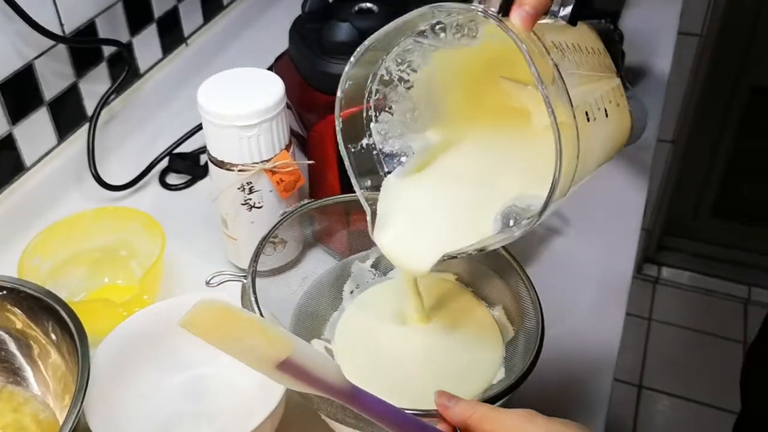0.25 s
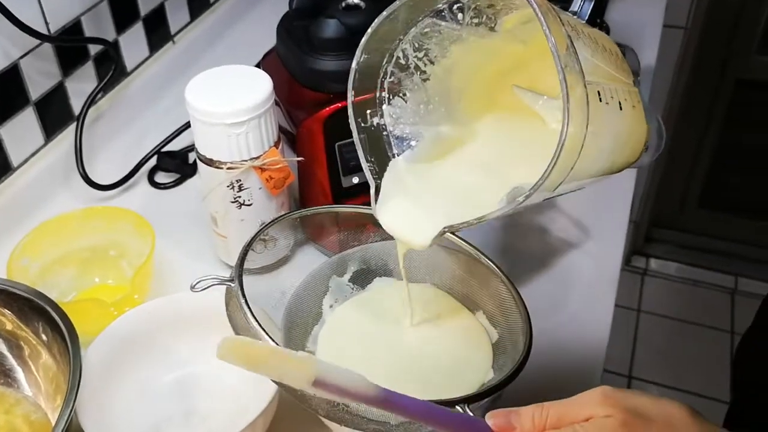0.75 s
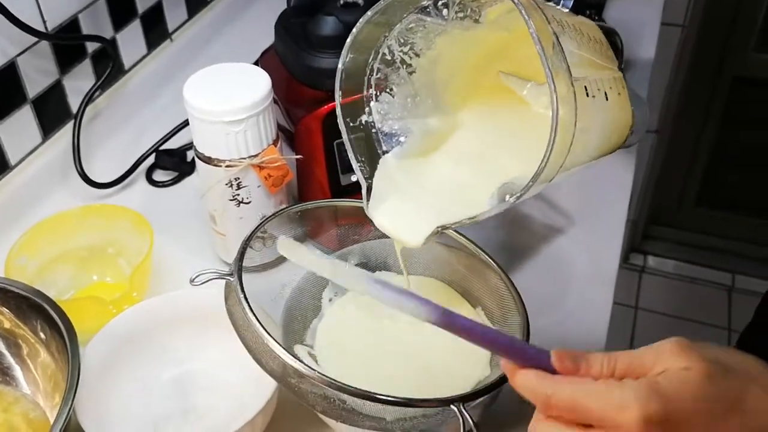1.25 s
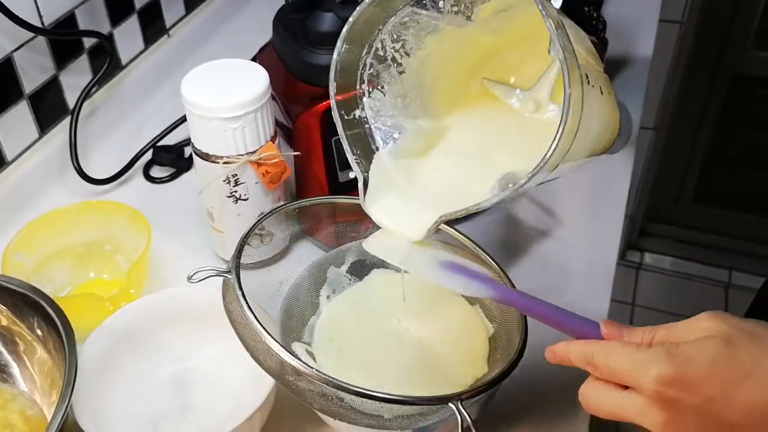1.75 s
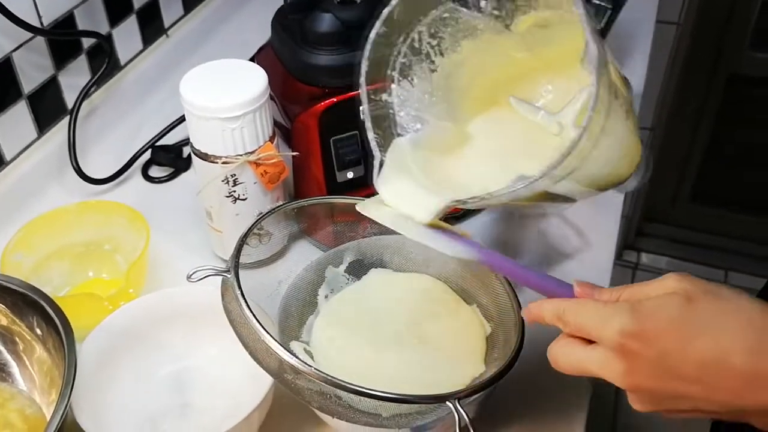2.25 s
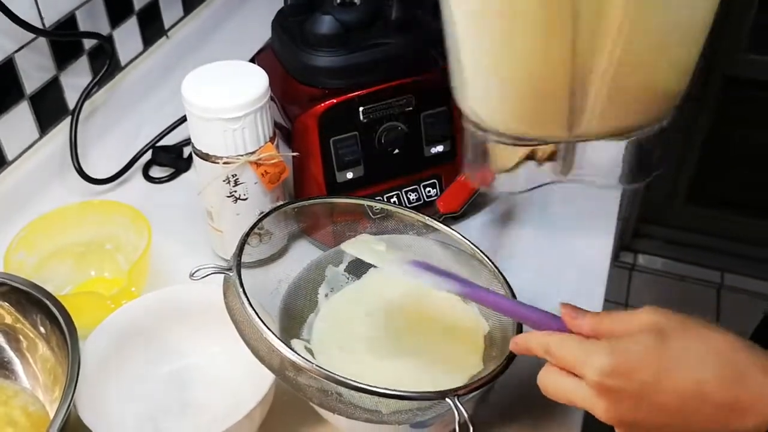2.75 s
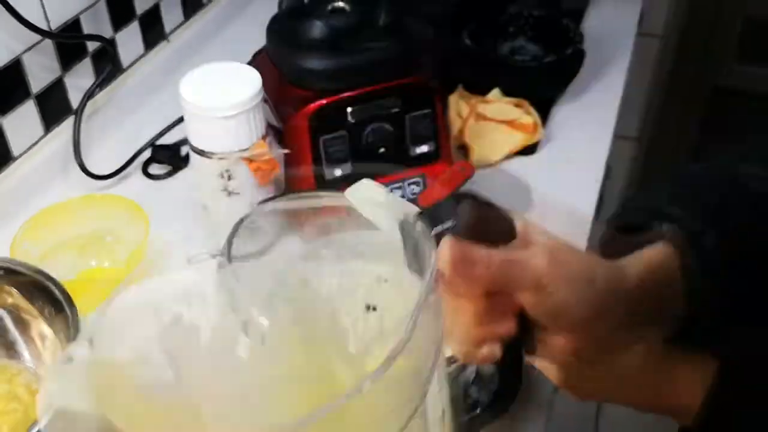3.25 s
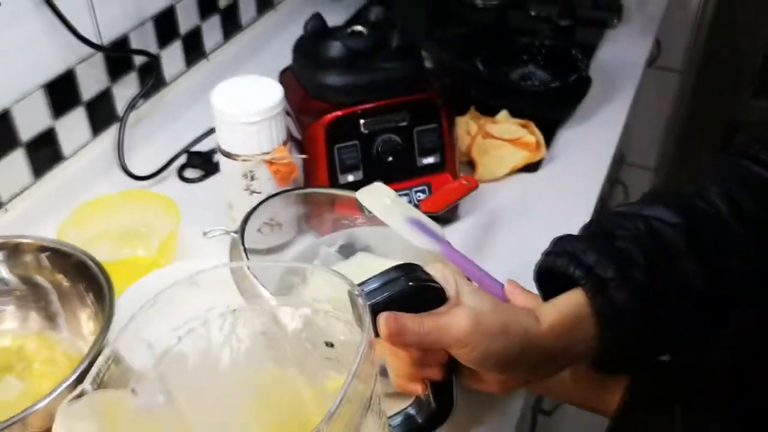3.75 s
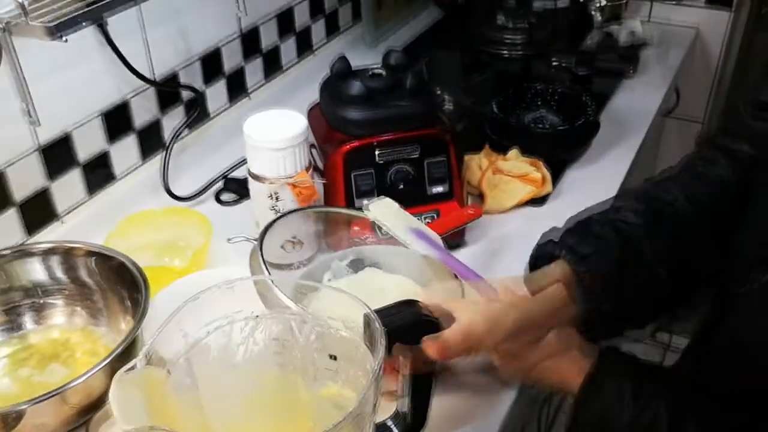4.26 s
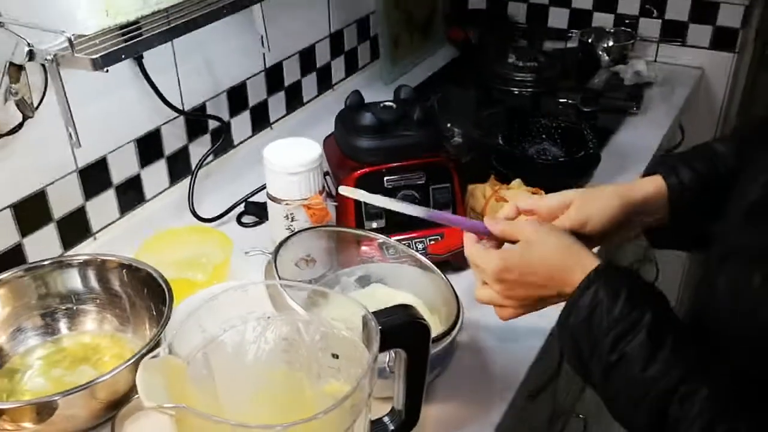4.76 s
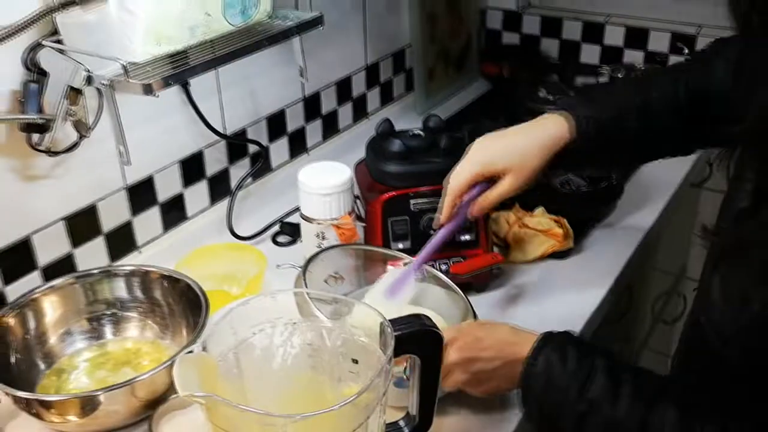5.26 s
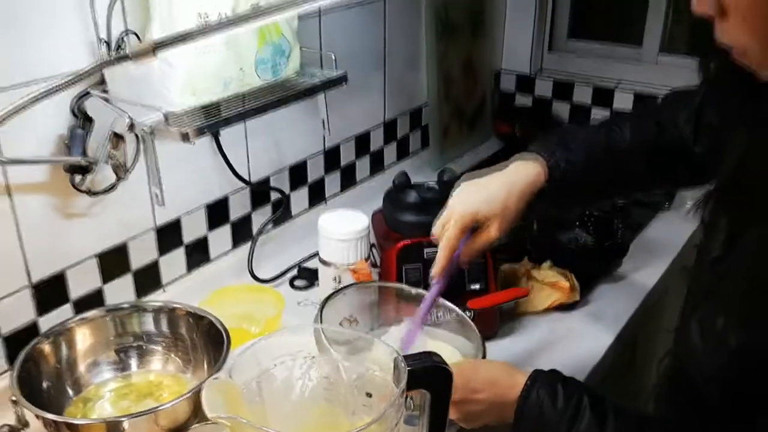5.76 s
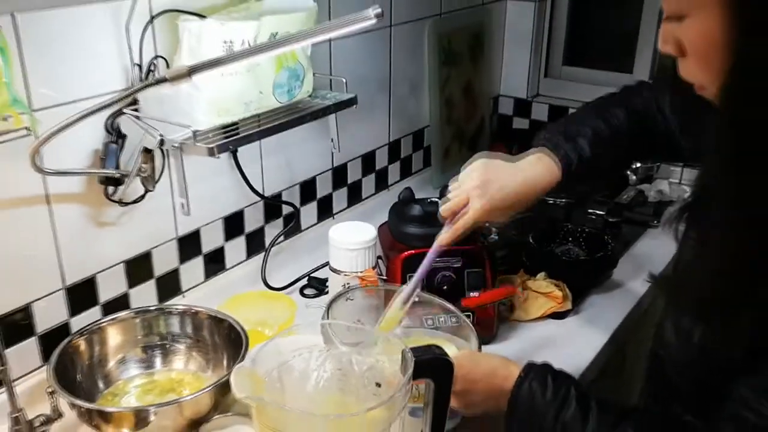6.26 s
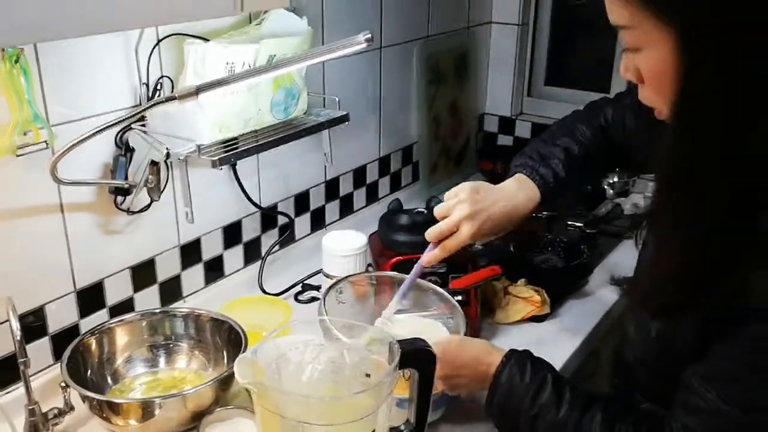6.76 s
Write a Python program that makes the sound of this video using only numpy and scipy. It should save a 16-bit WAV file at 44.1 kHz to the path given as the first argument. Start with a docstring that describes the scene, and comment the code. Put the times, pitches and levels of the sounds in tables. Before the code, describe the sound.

A silicone spatula rubs a steel sieve and gives it one sharp tap, making the rim and mesh ring faintly. After a lull, a blender jug is set on the counter with two bouncing knocks, each with a low thud and a rattle of loose blades. A nylon sleeve rustles and crinkles, then soft scrapes resume. A nearby phone picks this up in a quiet tiled kitchen with a low rumble and hiss.

```python
"""A silicone spatula rubs and taps a steel sieve, making its rim, its mesh and the bowl under it ring.
A blender jug is set down with two bouncing knocks: its wall and loose blades ring and the counter thuds.
A nylon sleeve rustles and crinkles. Behind it all, faint tones come and go and the building rumbles,
with a drone and a hiss. The quiet tiled kitchen is heard through the two microphones of a nearby phone."""
import sys
import numpy as np
from scipy import signal
from scipy.fft import rfft, irfft, next_fast_len
from scipy.io import wavfile
from scipy.ndimage import map_coordinates

SR = 44100
rng = np.random.default_rng(int(sys.argv[2]) if len(sys.argv) > 2 else 0)


def to_wav(sig):
    """Store sig (one row per channel, or 1-D mono) as 16-bit WAV at the path in sys.argv[1].

    Samples outside -1..1 are clipped; the rate is SR.
    """
    pcm = np.clip(np.atleast_2d(sig), -1, 1) * 32767
    pcm = np.round(pcm).astype(np.int16)
    wavfile.write(sys.argv[1], SR, pcm.T)  # frames by channels


N = 309428
TIME = np.arange(N) / SR

# Spatula strokes: (start [s], length [s], rim [dB], grit [dB], mesh [dB], bowl [dB])
STROKES = [(.13, 0.059, -59, -70, -69, -73), (.57, 0.12, -44, -47.5, -56.5, -66),
           (.813, 0.0073, -65, -44, -64, -63), (.84, 0.068, -57.5, -85, -65.5, -68),
           (5.328, 0.027, -74, -83, -64.5, -59), (5.35, 0.046, -77, -76, -69, -64.5),
           (5.41, 0.061, -58.5, -62.5, -60.5, -76), (5.46, 0.16, -58.5, -68, -63, -69),
           (5.58, 0.039, -84, -90, -94, -62), (5.9, 0.033, -60, -60.5, -60, -54),
           (5.92, 0.088, -71, -63.5, -59, -80), (6.395, 0.013, -49.5, -63, -59.5, -62),
           (6.45, 0.039, -71.5, -81, -63.5, -57), (6.81, 0.043, -77, -57, -92, -78.5)]
# Short squeaks: (start [s], length [s], level [dB])
SQUEAK_TIMES = [(.555, 0.041, -64), (5.99, .03, -61.5), (6.55, 0.035, -63.5), (6.95, 0.085, -60)]
# The notes of the rim, mesh, bowl and squeak: (pitch [Hz], width [Hz], level [dB])
RIM_NOTES = [(1783, 45, -8.5), (3070, 21, -2), (3980, 46, -6.5), (4400, 130, -9), (4720, 40, 3.5),
             (5720, 60, -9.5), (6740, 44, -3.5), (9000, 32, -9.5), (11100, 44, -20)]
MESH_NOTES = [(1210, 600, -9.5), (1440, 42, -7), (1674, 110, -2)]
BOWL_NOTES = [(296, 10.4, -2), (588.6, 6.1, -12.5)]
SQUEAK_NOTES = [(1060, 37, 6), (1180, 34, -30)]
# Tone of the gritty rubbing: (frequency [Hz], level [dB])
GRIT_TONE = [(500, -59), (1200, -31), (2000, -9), (3900, 0), (5600, -4), (7000, -2), (9500, -21.5),
             (14400, -24), (15800, -54)]
def spatula():
    """Tiny slips on the mesh ring the rim, the mesh and the bowl, with grit and short squeaks."""
    def strokes(rows):
        return sum(np.outer(amp(db), held(start, length, rise_s=0.31 * length, fade_s=0.17))
                   for start, length, *db in rows)

    def rubbed(notes):
        slips = rng.standard_normal((2, N)) + 0.7 * rng.standard_normal(N)
        slips *= amp(0.85 * wobble(150))
        ringing = filtered(slips, lambda hz: resonance(notes, hz) * hz / (hz + 100))
        return unit(microphones(ringing, lag=0))

    rim, grit, mesh, bowl = strokes(STROKES)
    return (rim * rubbed(RIM_NOTES) + grit * noise(GRIT_TONE, flicker_db=2) + mesh * rubbed(MESH_NOTES)
            + strokes(SQUEAK_TIMES) * rubbed(SQUEAK_NOTES) + bowl * rubbed(BOWL_NOTES))


# Light taps and sleeve crinkles:
# (time [s], level [dB], pitch [Hz], spread [band edge / pitch], time to fade 60 dB [s])
TAPS_AND_CRINKLES = [(0.0969, -51.5, 3070, 2.3, 0.09), (0.2441, -37.5, 1910, 1.35, 0.046),
                     (0.2465, -40, 3730, 1.42, 0.027), (0.286, -52, 1640, 1.13, 0.044),
                     (0.557, -46.5, 1030, 1.2, 0.02), (0.5778, -43, 4750, 1.5, 0.018),
                     (0.7054, -22.5, 2900, 5.6, 0.047), (0.7089, -13.5, 2400, 3.03, 0.024),
                     (0.7104, -19.5, 1110, 1.32, 0.029), (0.7246, -41, 1255, 1.06, 0.042),
                     (0.7668, -43, 1157, 0.92, 0.026), (0.816, -35, 6000, 1.08, 0.016),
                     (0.8248, -38, 3980, 1.9, 0.02), (1.281, -46.5, 2140, 1.35, 0.0074),
                     (4.3189, -20, 4560, 1.68, 0.021), (4.5085, -44, 4070, 3.6, 0.04),
                     (4.5984, -45, 4600, 1.64, 0.28), (4.6678, -41, 2440, 8.7, 0.019),
                     (4.685, -42, 4400, 2.1, 0.1), (4.712, -31, 5000, 1.23, 0.016),
                     (4.7218, -41, 4100, 2.8, 0.11), (4.812, -40, 4700, 1.7, 0.035),
                     (4.908, -46.5, 4200, 2.4, 0.36), (5.3297, -46.5, 1052, 1.8, 0.062),
                     (5.412, -43.5, 2500, 3.6, 0.023), (6.3984, -47, 4740, 1.4, 0.056),
                     (6.4732, -48.5, 6100, 1.13, 0.1), (6.8205, -52.5, 3980, 1.6, 0.06)]
# Soft low bumps: (time [s], level [dB], pitch [Hz], time to fade 60 dB [s])
LOW_BUMPS = [(.706, -30, 239, 0.071), (0.706, -31, 416, 0.027), (1.811, -59, 436, 0.1),
             (2.169, -58.5, 444, 0.085), (4.667, -36, 250, 0.021), (5.007, -38, 103, 0.054),
             (5.21, -61, 474, 0.082)]
def taps_and_crinkles():
    """Light taps and sleeve crinkles, each a brief puff of noise, and a few round low bumps."""
    out, t = np.zeros((2, N)), np.arange(SR // 10) / SR
    for start, db, hz, spread, fade_s in TAPS_AND_CRINKLES:
        spread = max(spread, 1.05)
        band = signal.butter(3, [hz / spread, hz * spread], "band", fs=SR, output="sos")
        burst = rng.standard_normal(len(t)) * rise(t, 0.00012) * fade(t, fade_s)
        puff = signal.sosfilt(band, burst)
        puff = filtered(puff, lambda f: 1 / np.sqrt(1 + (f / 6180) ** 6))  # dulls the highest treble
        add(out, start, amp(db) * in_room(puff / np.abs(puff).max(), echo_db=-4, lag=25))
    for start, db, hz, fade_s in LOW_BUMPS:
        bump = np.sin(2 * np.pi * hz * t) * rise(t, 0.0036) * fade(t, fade_s)
        add(out, start, amp(db) * in_room(bump, echo_db=-4.5, lag=-16))
    return out


# The jug's knocks and bounces: (time [s], crack [dB], deep thud [dB], middle thud [dB], upper thud [dB],
# wall [dB above the crack], blades [dB above the crack])
JUG_KNOCKS = [(3.8591, -20, -29.5, -28.5, -36, -10.5, -5.5), (3.8631, -20, -40, -22, -23.5, -9.5, 2.5),
              (3.875, -19.5, -37, -36, -32.5, -36.5, -2), (4.07, -42, -56.5, -33, -42.5, -7, -17.5),
              (4.0738, -30.5, -40.5, -28.5, -40, -0.5, -39), (4.157, -43, -55.5, -41.5, -45.5, 1.5, -24),
              (4.2362, -13.5, -29, -23, -27.5, -7.5, -9), (4.257, -26, -46, -29.5, -28.5, -4, -11)]
# Tone of the sharp crack: (frequency [Hz], level [dB])
CRACK_TONE = [(300, -43), (500, 10), (760, 9), (1000, 3), (1400, 4.5), (2350, 3.5), (2910, 1.5),
              (5550, -4.5), (8030, -18.5), (9510, -49), (10300, -60), (14600, -49), (15800, -77)]
# The notes of the jug wall, blades and counter: (pitch [Hz], level [dB], time to fade 60 dB [s])
WALL_NOTES = [(975, -17, .05), (1115, -24, .04), (1732, -7.5, 0.047), (1993, -2, 0.041), (2226, -11, .045),
              (2350, -4, .04), (2454, 1, 0.031), (2949, -12.5, 0.053), (3015, -20.5, .06),
              (3520, -20.5, 0.035), (3826, -13, .05)]
BLADE_NOTES = [(4694, -4, 0.0897), (4500, -4.5, 0.047), (5050, -23, 0.1), (5550, -11.5, 0.1),
               (5730, -12.5, .07), (7130, -6, 0.092), (7340, -7, 0.107), (7900, -20, .15),
               (8626, -15, 0.18), (10340, -34, 0.28), (12310, -22, 0.19), (12400, -35, 0.17),
               (13350, -40.5, .3), (14200, -16, 0.072), (14500, -28, 0.16)]
COUNTER_DEEP = [(38.8, 0.5, 0.51), (55.1, -4.5, 0.47), (90.2, -2, 0.3)]
COUNTER_MIDDLE = [(144.3, 3.5, 0.11), (174, 5, 0.1)]
COUNTER_UPPER = [(235.4, -2.5, .4), (292.1, 1, 0.26), (342.7, -8, 0.24), (470.5, 0, .1), (498, -11, 0.15)]
def jug():
    """Each knock cracks, rings the jug wall and its loose blades, and thuds through the counter."""
    out, t = np.zeros((2, N)), np.arange(SR // 2) / SR
    for start, db, deep_db, middle_db, upper_db, wall_db, blade_db in JUG_KNOCKS:
        crack = unit(filtered(rng.standard_normal(len(t)), lambda hz: amp(along(CRACK_TONE, hz))))
        crack *= fade(t, 0.036)
        flutter = 1 + 0.8 * unit(filtered(rng.standard_normal(len(t)), lambda hz: hz < 200))
        wall = amp(wall_db) * rise(t, 0.0006) * flutter * ring(WALL_NOTES, t, detune=0.024)
        blades = amp(blade_db) * np.sqrt(np.abs(flutter)) * ring(BLADE_NOTES, t, detune=0.0088)
        blades *= rise(t, 0.012)  # the blades take up the shock late
        add(out, start, amp(db) * in_room(crack + wall + blades, echo_db=-1.2, lag=26.6))
        counter = [(deep_db, COUNTER_DEEP), (middle_db, COUNTER_MIDDLE), (upper_db, COUNTER_UPPER)]
        thud = sum(amp(level) * ring(notes, t, detune=0.05) for level, notes in counter)
        add(out, start, in_room(rise(t, 0.0037) * thud, echo_db=-22.5, lag=-14))
    return out


def counter_shudder():
    """The counter keeps shaking in the bass after each knock."""
    shake = sum(amp(middle_db - 11) * held(start, 0, rise_s=0.024, fade_s=0.71)
                for start, _, _, middle_db, *_ in JUG_KNOCKS)
    return shake * noise(DRONE_TONE, flicker_db=1)


# Arm moves: (loudest moment [s], rise [s], fall [s], level [dB])
ARM_MOVES = [(1.15, 0.096, 0.25, -66), (2.88, .15, 0.16, -64.5), (3.24, 0.11, 0.11, -53),
             (3.6, 0.42, 0.078, -69), (4.3, 0.25, 0.28, -51.5), (4.85, 0.6, 0.19, -56.5),
             (5.45, 0.39, 0.78, -63.5), (6.36, 0.077, 0.065, -58.5), (6.84, 0.11, 0.18, -68.5)]
# Tone of the rustle: (frequency [Hz], level [dB])
NYLON_TONE = [(470, -39.5), (800, -7), (1400, -10.5), (2010, -4.5), (2230, -5.5), (2650, -0.5),
              (3120, -3.5), (4050, 0.5), (6270, -5), (7760, -3), (9960, -18), (12500, -17), (14700, -24),
              (15200, -24.5), (15800, -35)]
def sleeve():
    """Nylon slides on nylon, swelling with each arm move and barely rustling at rest."""
    resting_db = -72.5
    power = sum(amp(2 * db) * np.exp(-((TIME - peak) / np.where(TIME < peak, rise_s, fall_s)) ** 2)
                for peak, rise_s, fall_s, db in ARM_MOVES)
    return np.sqrt(power + amp(2 * resting_db)) * amp(0.5 * wobble(30)) * noise(NYLON_TONE, 0.5)


# Faint tones: (start [s], length [s], pitch [Hz], level [dB])
FAINT_TONES = [(0.846, 0.685, 1217, -71), (3.297, 0.3, 1117, -71.5), (5.603, 0.31, 1138, -71)]
def faint_tones():
    """Tones come and go; a fast wobble in strength makes them fuzzy."""
    return sum(amp(db) * held(start, length, rise_s=0.04, fade_s=0.41) * np.sin(2 * np.pi * hz * TIME)
               * [wobble(120), wobble(120)] for start, length, hz, db in FAINT_TONES)


# Tone of the rumble, drone and hiss: (frequency [Hz], level [dB])
RUMBLE_TONE = [(8.8, -51), (15, 10), (35, 9.5), (46, -6.5), (59, -21.5), (80, -25), (100, -50), (180, -120)]
DRONE_TONE = [(35, -47.5), (60, 2.5), (87, 2.5), (102, -4), (216, -8.5), (346, -22), (437, -23), (600, -25),
              (780, -58), (1320, -120)]
HISS_TONE = [(240, -23.5), (400, -20.5), (665, 9.5), (775, 5.5), (1430, 3.5), (2240, 6), (3050, -3),
             (3780, 1.5), (4690, -12), (5640, 0), (6470, -11), (7670, -7.5), (9810, -17), (14600, -14.5),
             (15800, -16)]
# How the rumble and drone swell and sink: (time [s], level [dB])
RUMBLE_SWELL = [(0, -47.5), (.4, -53), (1.3, -55.5), (2.2, -49.5), (3.4, -54), (4.8, -48.5), (5.3, -48.5),
                (6.0, -55), (7.02, -50.5)]
DRONE_SWELL = [(0, -63.5), (.7, -56.5), (1.2, -61), (3.0, -61), (4.6, -57.5), (7.02, -58.5)]
def building():
    """The building rumbles unevenly under a low drone and a steady hiss."""
    lumps = amp(3.5 * wobble(2.863) + 2.5 * wobble(7.3))
    rumble = swell(RUMBLE_SWELL) * lumps * noise(RUMBLE_TONE, flicker_db=-2.5)
    drone = swell(DRONE_SWELL) * amp(1.1 * wobble(10)) * noise(DRONE_TONE, flicker_db=4)
    hiss = amp(-69) * noise(HISS_TONE, flicker_db=0.5)
    return rumble + drone + hiss


# Echo of the tiles: (frequency [Hz], time to fade 60 dB [s])
TILE_ECHO = [(150, 0.36), (500, 0.3), (2000, 0.21), (6000, 0.2), (12000, 0.19)]
def in_room(x, echo_db, lag):
    """A short sound plus its echo off the tiles, where high notes die sooner than low ones."""
    size = SR // 3
    hz, t, spectrum = signal.stft(rng.standard_normal((2, size)), SR, nperseg=256)
    fade_s = along(TILE_ECHO, hz)[:, None]
    tail = signal.istft(spectrum * fade(t, fade_s) / np.sqrt(fade_s), SR, nperseg=256)[1][:, :size]
    tail *= np.clip(np.arange(size) / (0.0015 * SR), 0, 1)
    echo = signal.fftconvolve(x[None], tail / np.linalg.norm(tail[0]), axes=1)
    return microphones(np.pad(x, (0, size - 1)) + amp(echo_db) * echo, lag)


# Balance of the two microphones: (frequency [Hz], left above right [dB])
MIC_BALANCE = [(250, 0), (380, 0), (900, 1.5), (1500, -1.5), (2600, -6.5), (3600, -11.5), (5600, -10.5),
               (8120, 1.5), (12000, -7), (15000, -3.5)]
def microphones(pair, lag):
    """Each microphone opening colours its side; the left one hears lag samples later."""
    return filtered(pair, lambda hz: amp(np.outer([0.5, -0.5], along(MIC_BALANCE, hz)))
                    * np.exp(-1j * np.pi * np.outer([1, -1], hz) * lag / SR))


# How alike left and right are: (frequency [Hz], likeness [-1 to 1])
LIKENESS = [(40, .999), (60, .99), (130, 1), (290, 0.76), (640, -0.6), (1400, 0.32), (3100, -0.16),
            (15000, 0.11)]
def noise(tone, flicker_db):
    """Flickering stereo noise of average size 1, partly alike on the two sides."""
    def shape(hz):
        angle = np.arccos(np.clip(along(LIKENESS, hz), -1, 1)) / 2
        return amp(along(tone, hz)) * [np.cos(angle), np.sin(angle)]

    grains = rng.standard_normal((2, N)) * amp(flicker_db * wobble(400))
    mid, side = filtered(grains, shape)
    return unit(microphones(np.array([mid + side, mid - side]), lag=0))


def ring(notes, t, detune):
    """Notes struck at slightly random strengths, each a close pair of tones that beats."""
    offsets = detune * rng.standard_normal(len(notes))
    scatter_db = 1.5 * rng.standard_normal(len(notes))
    return sum(amp(db + extra_db) * fade(t, fade_s)
               * (np.sin(2 * np.pi * hz * t) + 0.98 * np.sin(2 * np.pi * hz * (1 + offset) * t))
               for (hz, db, fade_s), offset, extra_db in zip(notes, offsets, scatter_db))


def resonance(notes, hz):
    """How an object with these notes answers a shake at each frequency."""
    return sum((-1) ** k * amp(db) * 1j * hz * width / (pitch ** 2 - hz ** 2 + 1j * hz * width)
               for k, (pitch, width, db) in enumerate(notes))


def held(start, length, rise_s, fade_s):
    """A volume that rises, holds and dies away."""
    t = TIME - start
    return np.clip(t / rise_s, 0, 1) * fade(np.clip(t - length, 0, None), fade_s)


def rise(t, seconds):
    """A smooth climb from 0 towards 1."""
    return 1 - np.exp(-t / seconds)


def fade(t, seconds):
    """A fall of 60 dB in the given time."""
    return amp(-60 * t / seconds)


def swell(points):
    """A volume that follows (time, level) points."""
    return amp(np.interp(TIME, *np.transpose(points), -150, -150))


def wobble(rate):
    """A smooth random curve through rate points a second."""
    return map_coordinates(rng.standard_normal(size=4096), [TIME * rate], mode="wrap")


def filtered(x, response):
    """x with each frequency multiplied by response(hz)."""
    n = x.shape[-1]
    padded = next_fast_len(n + 8192)
    return irfft(rfft(x, padded) * response(np.fft.rfftfreq(padded, 1 / SR)), padded)[..., :n]


def along(points, hz):
    """Read between (frequency, value) points on a log scale."""
    freqs, values = np.transpose(points)
    return np.interp(np.log(hz + 1), np.log(freqs + 1), values)


def amp(db):
    """Turn dB into a multiplier."""
    return 10 ** (np.asarray(db) / 20)


def unit(x):
    """x scaled to an average size (rms) of 1."""
    return x / np.sqrt(np.mean(x ** 2) + 1e-20)


def add(track, start, sound):
    """Mix a stereo sound in at start seconds."""
    part = track[:, round(start * SR):][:, :sound.shape[1]]
    part += sound[:, :part.shape[1]]


def scene():
    """Everything the two microphones hear."""
    return (building() + faint_tones() + sleeve() + spatula() + jug() + counter_shudder()
            + taps_and_crinkles())


def record(dry):
    """The phone keeps nothing above 15900 Hz."""
    return filtered(dry, lambda hz: hz < 15900)


dry = scene()
out = record(dry)
to_wav(out)
```